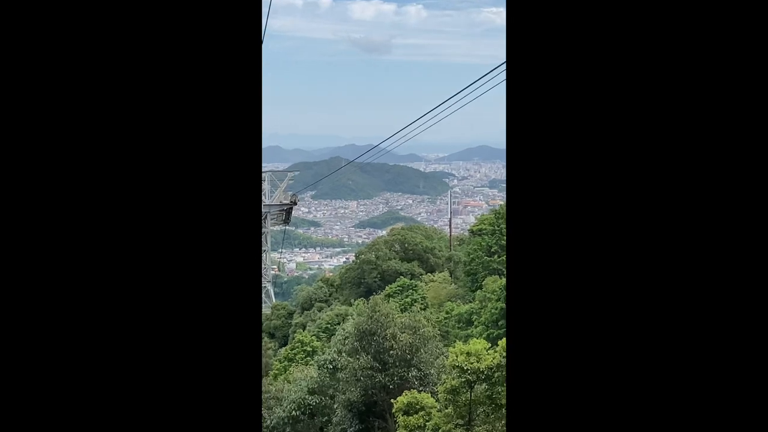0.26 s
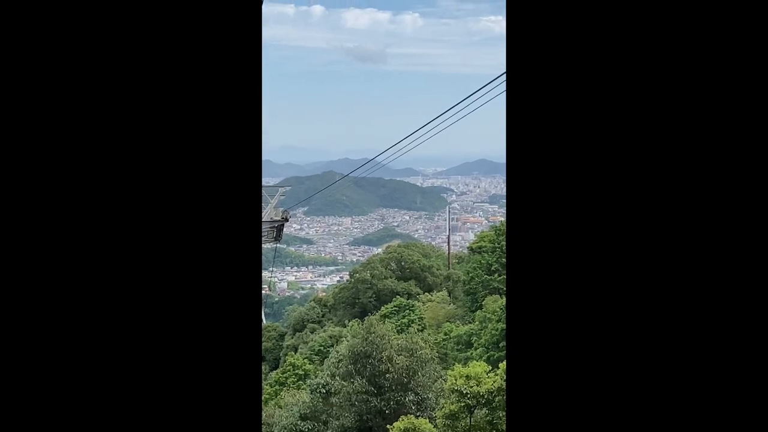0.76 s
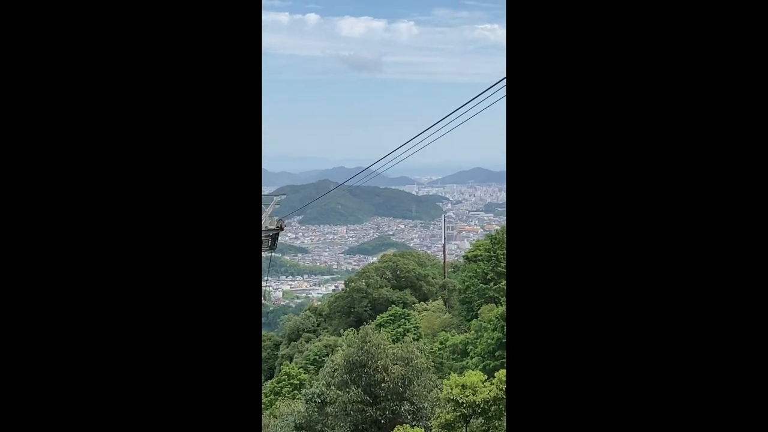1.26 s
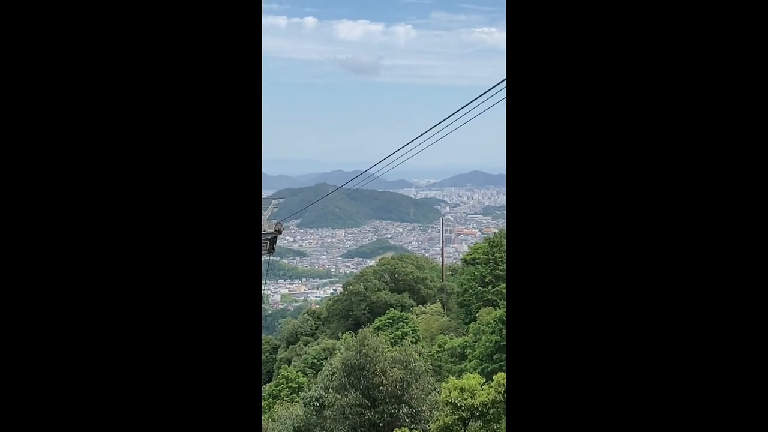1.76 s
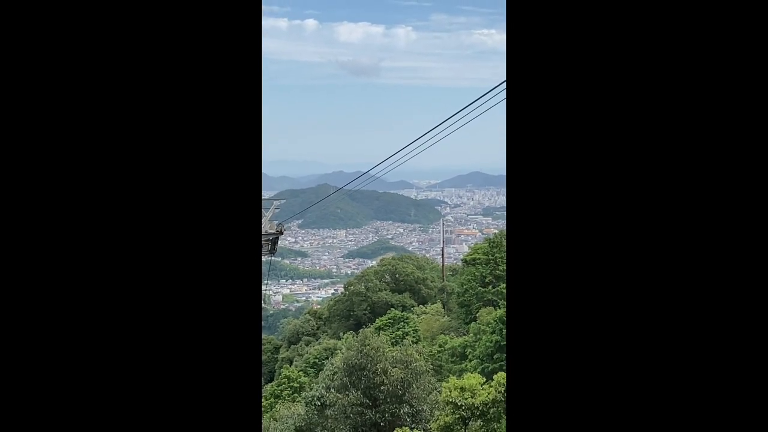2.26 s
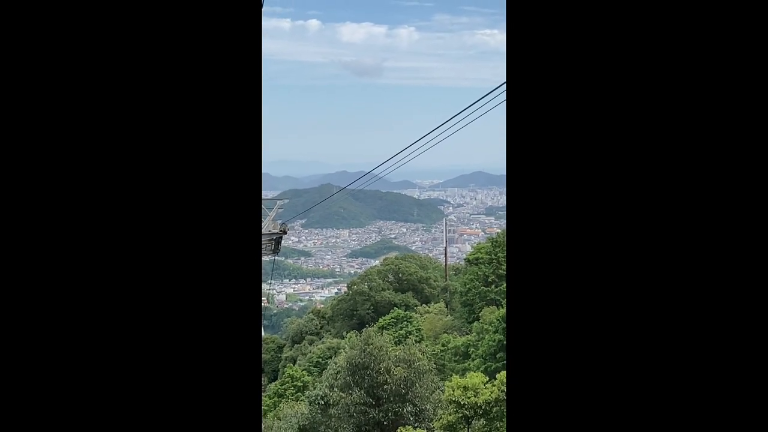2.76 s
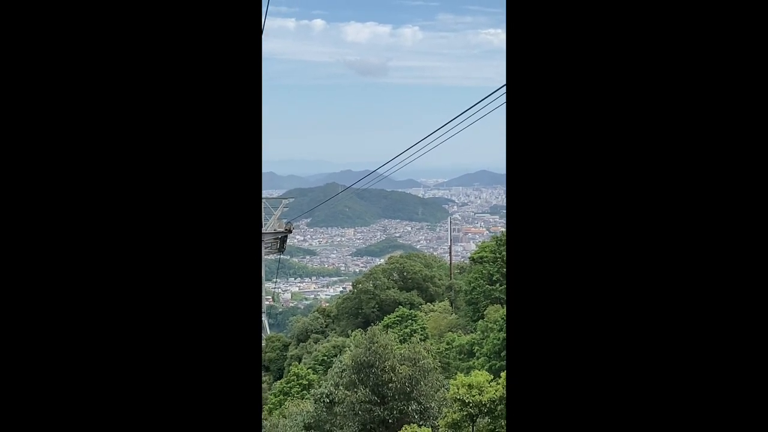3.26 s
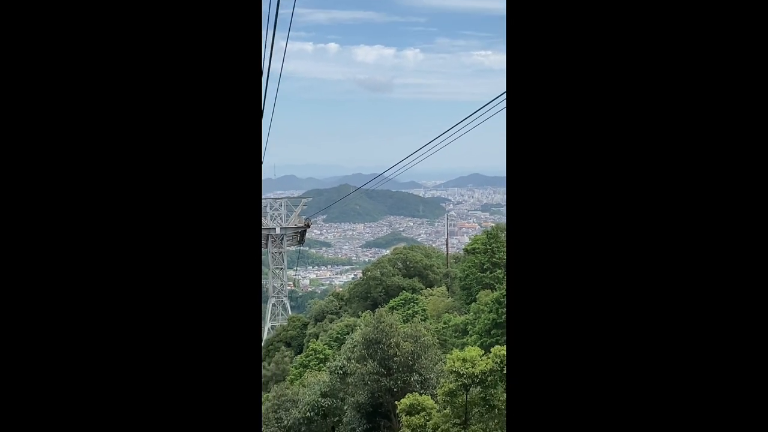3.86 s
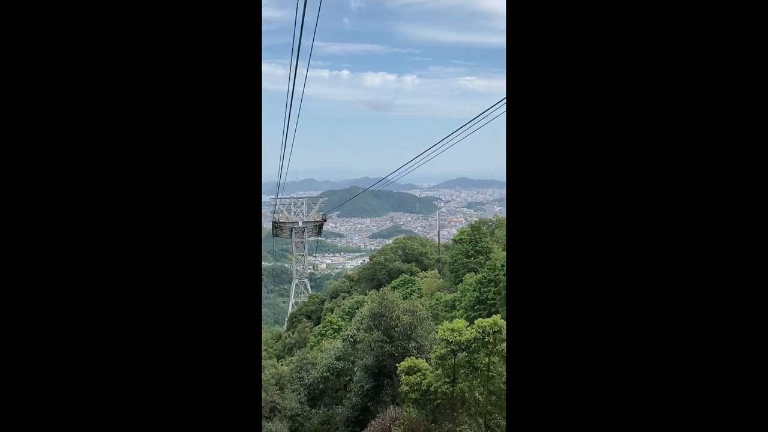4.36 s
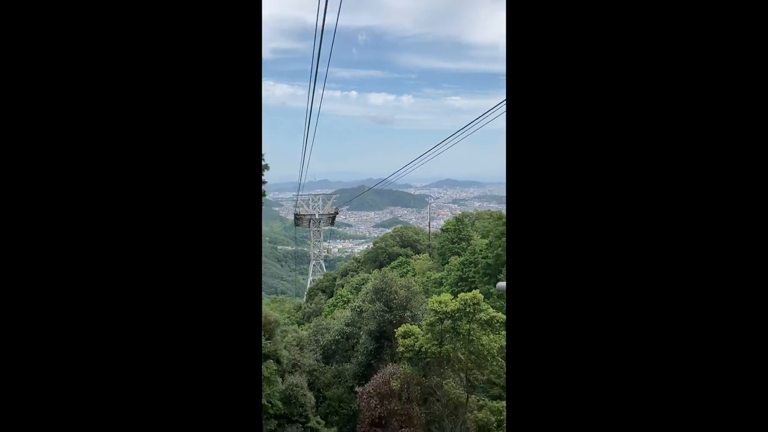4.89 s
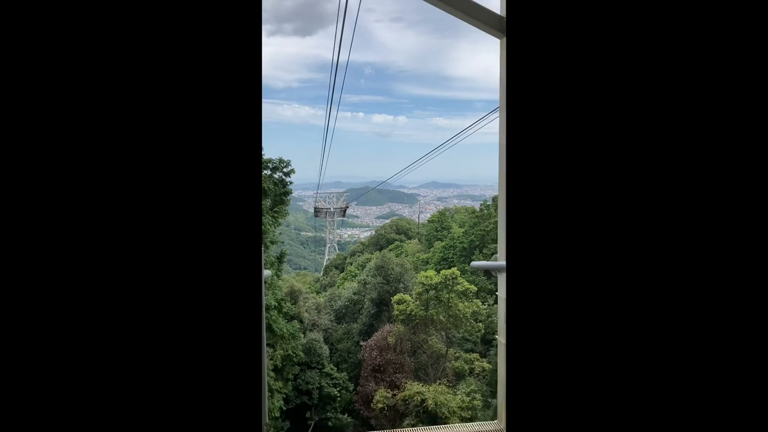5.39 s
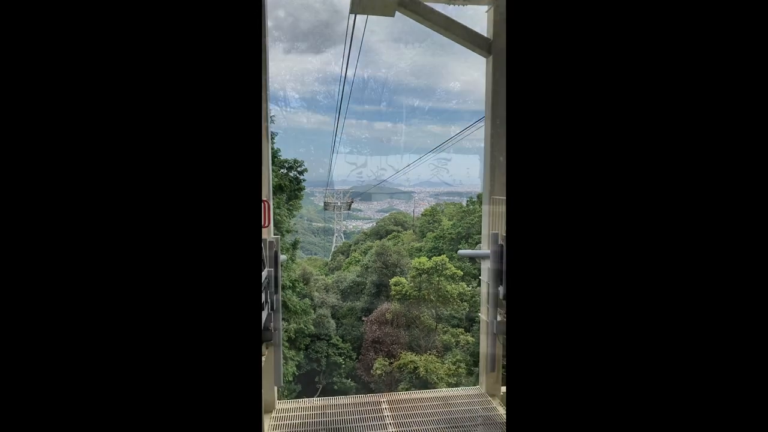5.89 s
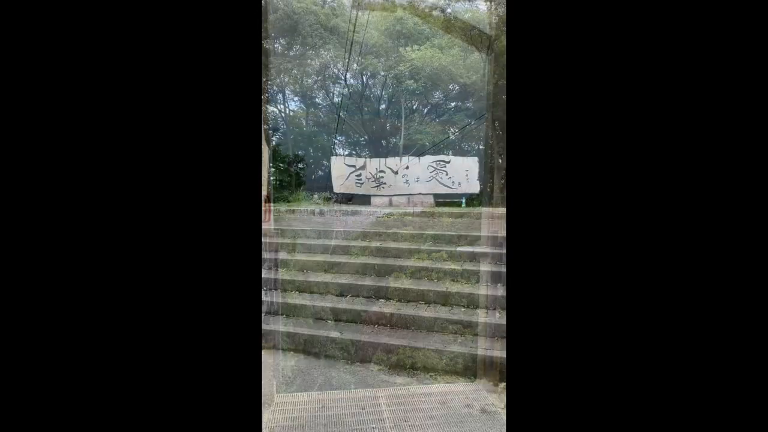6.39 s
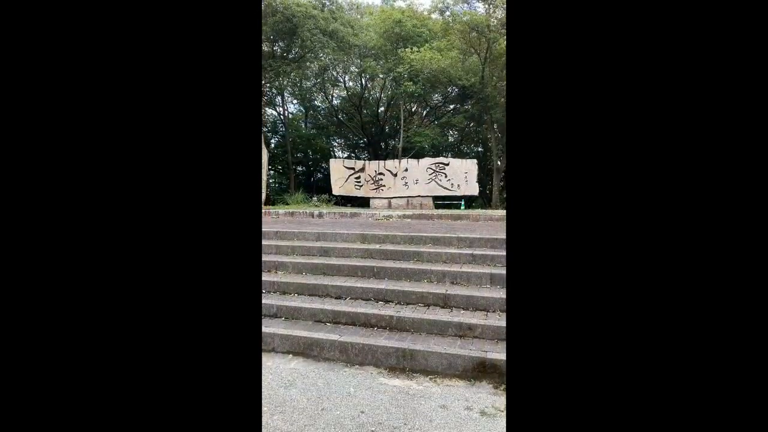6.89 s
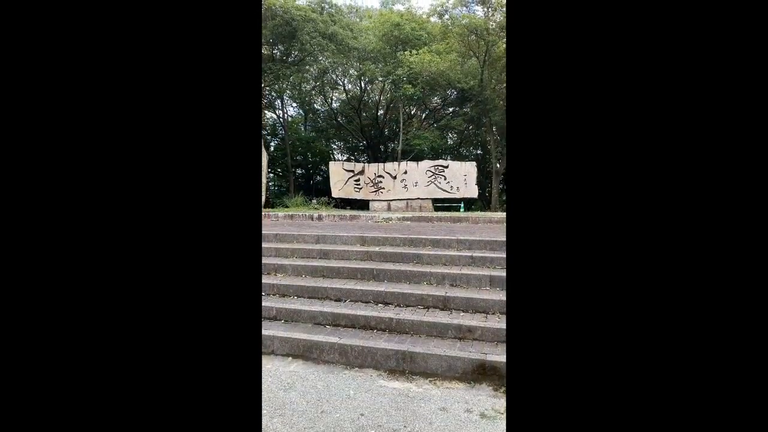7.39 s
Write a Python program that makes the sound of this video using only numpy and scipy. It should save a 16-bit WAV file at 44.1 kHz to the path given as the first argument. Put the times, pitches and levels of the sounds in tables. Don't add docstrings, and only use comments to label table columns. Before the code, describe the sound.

Outdoors on a wooded hillside, a thick cicada chorus hisses brightly and steadily above the low hum, rumble and thin whine of cable car machinery. A tiny air pop touches the microphone before four seconds. A single cicada winds up around five seconds. Near six seconds everything cross-fades to a quieter spot with faint distant hum, a throbbing cicada and a high trill.

```python
import sys
import numpy as np
from scipy import signal
from scipy.fft import rfft, irfft, next_fast_len
from scipy.io import wavfile
from scipy.ndimage import uniform_filter1d

SR = 44100
rng = np.random.default_rng(int(sys.argv[2]) if len(sys.argv) > 2 else 0)


def master_out(mix):
    frames = np.transpose(np.atleast_2d(mix))
    ceiling = np.clip(frames, -1, 1)
    pcm = np.round(ceiling * 32767).astype(np.int16)
    wavfile.write(sys.argv[1], SR, pcm)


def voltage_ratio(decibels):
    exponent = np.asarray(decibels, float) / 20
    return 10 ** exponent


N = 336909

# start_s, loudest_singer_pitch_hz, effort_db
CICADAS = [(0, 2110, -4), (.6, 2177, -1), (1.3, 2206, 2.5), (2, 2180, -1), (2.6, 2130, -4),
           (3.3, 2165, -10), (4.15, 2170, -13), (4.5, 2185, -3.5), (5, 2173, -2.5), (5.7, 2180, 3),
           (6.3, 2133, .4), (6.9, 2198, 3.5), (7.64, 2150, -3.5)]
POP_S = 3.6603


def evened(x):
    return x / np.sqrt(np.mean(x ** 2) + 1e-20)


def read(points, hz):
    f, value = np.transpose(points)
    return np.interp(np.log(hz + 1), np.log(f + 1), value)


def curves(rows, t):
    s, *columns = np.transpose(rows)
    return [np.interp(t, s, column) for column in columns]


def drift(rate_hz, shape=()):
    knots_per_s = 40
    knots = int(N / SR * knots_per_s) + 2
    rolloff = 1 + (np.fft.rfftfreq(knots, 1 / knots_per_s) / rate_hz) ** 4
    z = rfft(rng.standard_normal(shape + (knots,))) / rolloff
    slow = evened(irfft(z, knots)).reshape(-1, knots)
    at_knot = np.arange(N) / SR * knots_per_s
    return np.reshape([np.interp(at_knot, np.arange(knots), v) for v in slow], shape + (N,))


def ring(x, hz, width_hz):
    b, a = signal.iirpeak(hz, hz / width_hz, SR)
    return evened(signal.lfilter(np.convolve(b, b), np.convolve(a, a), x))


def resonate(x, hz, width_hz):
    turn = np.exp(2j * np.pi * np.cumsum(hz * np.ones(N)) / SR)
    r = np.exp(-np.pi * width_hz / SR)
    smooth = signal.lfilter([1], [1, -2 * r, r * r], x / turn)
    return evened((turn * smooth).real)


def clicks(per_s, jitter, spread_db):
    count = np.floor(np.cumsum(per_s * (1 + jitter * drift(15))) / SR)
    return (np.diff(count, prepend=0) > 0) * voltage_ratio(spread_db * rng.standard_normal(N))


def wash(field_db, patchy_db, size):
    hop = size // 4
    frames, hz = N // hop + 5, np.fft.rfftfreq(size, 1 / SR)
    a, b, patches = rng.standard_normal((3, 2, len(hz), frames))
    patches = uniform_filter1d(patches[0], size=8, axis=0)
    patches = evened(uniform_filter1d(patches, size=16, axis=1))
    level_db = field_db(hz[:, None], np.arange(frames) * hop / SR) + patchy_db * patches
    z = (a + 1j * b) * voltage_ratio(level_db)
    return signal.istft(z, nperseg=size, noverlap=size - hop)[1][:, :N]


def tones(places, table):
    t, out = np.arange(N) / SR, np.zeros((2, N))
    for (hz, lag_rad), (left_db, right_db, waver) in zip(places, table):
        angle = 2 * np.pi * (hz * t + rng.random()) + waver * drift(0.4)
        strength = np.sqrt(2) * (1 + waver * drift(7.7)) * voltage_ratio([[left_db], [right_db]])
        out += strength * np.sin([angle, angle + lag_rad])
    return out


def dissolve(t):
    from_s, to_s, station_left = 5.78, 6.75, 0.037
    steps = np.clip((t - from_s) / (to_s - from_s), 0, 1)
    return 1 - (1 - station_left) * steps, steps


def both_db(t, station_db, steps_db):
    station, steps = dissolve(t)
    return 20 * np.log10(np.hypot(station * voltage_ratio(station_db), steps * voltage_ratio(steps_db)))


def town():
    # hz, level_db_per_hz
    spectrum = [(28, -29), (42, -2), (70, -1.5), (190, -6), (250, -15), (374, -10), (455, -16.5),
                (847, -23), (1120, -15.5), (1600, -21), (2000, -12), (2600, -12), (3600, -23.5)]
    return voltage_ratio(-49.5) * evened(wash(lambda hz, t: read(spectrum, hz), 0.82, size=2048))


def far_hum():
    # hz, right_lag_rad
    hum_at = [(48.8, 0), (74.5, 0), (123.8, 0)]
    # left_db, right_db, waver_0_to_1
    hum = [(-53.5, -52.5, .2), (-54.5, -55.5, .2), (-61, -60, .3)]
    return tones(hum_at, hum)


def machinery():
    # hz, level_db_per_hz
    spectrum = [(28, -45), (42, -27), (60, -4.5), (140, -2.5), (220, -6), (300, -10.5), (400, -8.5),
                (520, -14.5), (900, -14.5), (1400, -18.5), (1900, -18.5), (2600, -19), (3500, -25.5)]
    return voltage_ratio(-45) * evened(wash(lambda hz, t: read(spectrum, hz), 0.94, size=2048))


def drive_tones():
    # hz, right_lag_rad
    drive_at = [(57.5, 0), (119.7, 0), (269.3, .2), (538.6, .7), (807.9, -.3), (1077.2, -2.1),
                (1346.5, -.1), (1615.8, .2), (479.4, -.2), (1436.8, .2)]
    # left_db, right_db, waver_0_to_1
    levels = [(-52, -54, 0.38), (-50, -50.5, 0.39), (-68, -65.5, 0.79), (-51.5, -52, 0.06),
              (-60, -61, 0.14), (-57.5, -69, 0.38), (-60, -69.5, 0.22), (-86, -90, 0), (-59, -59.5, 0.2),
              (-74, -82, 0.5)]
    return tones(drive_at, levels)


def whines():
    whine_hz = [387, 3770, 4996, 5461, 5915, 7020, 8033, 8226]
    # width_hz, level_db, right_port_gain (1 alike, 0 silent, -1 opposite)
    shapes = [(21.6, -62, .9), (16, -65, -1), (16, -52, -.6), (16, -52, -.95), (22, -50, -.42),
              (16, -58, 0), (15, -56.5, .9), (40, -53, .9)]
    noise, out = rng.standard_normal(N), np.zeros((2, N))
    for hz, (width_hz, db, right) in zip(whine_hz, shapes):
        out += voltage_ratio(db) * ring(noise, hz, width_hz) * [[1], [np.clip(right, -1, 1)]]
    return out


def chorus():
    # hz, level_db_per_hz
    spectrum = [(2300, -22), (3200, -28.5), (3650, -61), (3850, -14.5), (4300, -3), (4800, -3), (5700, 1.5),
                (7200, -1), (8400, -3), (9200, -6), (9900, -12), (11000, -7.5), (13500, -6.5),
                (15700, -7.5)]
    yield_db_per_db = -.16
    ripple = evened(rng.standard_normal(513))[:, None]

    def field_db(hz, t):
        low_db = both_db(t, station_db=.4, steps_db=-.3) + yield_db_per_db * curves(CICADAS, t)[1]
        bright_db = both_db(t, station_db=-.3, steps_db=-1.4)
        share = np.clip((hz - 9500) / 1000, 0, 1)
        return read(spectrum, hz) + (1 - share) * low_db + share * bright_db + 1.3 * ripple
    return voltage_ratio(-34) * evened(wash(field_db, 1.67, size=1024))


def trill(db, swell_s, length_s, swell_db, hz, width_hz, clicks_per_s, bursts_hz, peak_s):
    t = np.arange(N) / SR
    stroke_db = 5 * np.cos(2 * np.pi * bursts_hz * (t - peak_s) + .3 * drift(1.2))
    leaves = rng.standard_normal((2, 300)) * np.exp(-np.arange(300) / 45.)
    strokes = clicks(clicks_per_s, 0.042, 2.5) * voltage_ratio(stroke_db)
    smeared = signal.oaconvolve(strokes[None], leaves, axes=1)[:, :N]
    swell = np.exp(-((t - swell_s) / length_s) ** 2)
    return voltage_ratio(db + swell_db * swell) * ring(smeared, hz, width_hz)


def trills(places):
    # level_db, swell_at_s, swell_length_s, swell_db
    songs = [
        (-53, 1.3, 1.2, 2),
        (-48.5, 6.97, .22, 4),
    ]
    # resonance_hz, width_hz, clicks_per_s, bursts_per_s, burst_peak_s
    wings = [(13600, 2500, 376, 16, 1.34), (15100, 1700, 205, 17.3, 7.035)]
    return sum(share ** 2 * trill(*song, *wing) for share, song, wing in zip(places, songs, wings))


def cicadas():
    # pitch_multiple, width_hz, mid_effort_db, slope_db_per_db_of_effort
    body = [(1.002, 77.5, -48, 0.4), (1.998, 260, -43, 0.8), (3.9, 710, -40, 0.49)]
    t = np.arange(N) / SR
    loudest_hz, effort_db = curves(CICADAS, t)
    sizes_hz = np.linspace(2070, 2310, num=5)[:, None]
    turn = voltage_ratio(1.5 * drift(.7, (5,)) - 5 * ((sizes_hz - loudest_hz) / 85) ** 2)
    turn = turn / np.sqrt((turn ** 2).sum(axis=0)) * voltage_ratio(2.07 * drift(16.0, (5,)))
    out = np.zeros((3, 2, N))
    for hz, share in zip(sizes_hz[:, 0], turn):
        drum = clicks(hz / 5.2, .12, 4.0)
        pair = np.array([drum, np.roll(drum, 4321)])
        pair = share * (pair + .15 * rng.standard_normal((2, N)))
        for k, (times, width_hz, _, _) in enumerate(body):
            out[k] += ring(pair, times * hz, width_hz) * np.std(pair)
    heard_db = both_db(t, 0, 0)
    return sum(voltage_ratio(heard_db + db + slope * effort_db) * evened(v) for v, (_, _, db, slope) in zip(out, body))


def solo(start_s, full_s, full_db, start_hz, full_hz, width_hz, throbs_hz, peak_s, depth_db):
    start_db, tire_db_per_s, sag_hz_per_s = -16, 3.5, 14.5
    t = np.arange(N) / SR
    missing = np.clip((full_s - t) / (full_s - start_s), 0, 1) ** 2
    after_s = np.maximum(t - full_s, 0)
    hz = full_hz + (start_hz - full_hz) * missing - sag_hz_per_s * after_s
    db = full_db + start_db * missing - tire_db_per_s * after_s
    throb = np.cos(2 * np.pi * throbs_hz * (t - peak_s) + .2 * drift(2))
    noise = rng.standard_normal((2, N))
    buzz = resonate(noise, hz, width_hz)
    buzz = buzz + 0.32 * ring(noise, full_hz / 2, 74)
    buzz = buzz + 0.7 * ring(noise, 2.04 * full_hz, 600)
    return voltage_ratio(db + depth_db * throb) * buzz * (t > start_s)


def solos(places):
    # start_s, full_voice_s, full_db, start_hz, full_hz
    songs = [
        (4.194, 5.4, -39, 4210, 4336),
        (5.9, 7.0, -45, 4140, 4168),
    ]
    # width_hz, throbs_per_s, throb_peak_s, depth_db
    buzzes = [(45, 8.5, 5.02, 2.1), (60, 9.95, 7.018, 6)]
    return sum(share * solo(*song, *buzz) for share, song, buzz in zip(places, songs, buzzes))


def pop():
    t = np.arange(12, 1100) / SR
    chirp = np.cos(2 * np.pi * np.log2(t / .00096))
    chirp = chirp * np.exp(-t / .016) * np.minimum(t / .001, 1) ** 2
    out = np.zeros(N)
    out[round(POP_S * SR) + 12:][:len(t)] = voltage_ratio(-32) * chirp
    return np.array([out, -out])


def ports(pair):
    # hz, likeness_0_to_1
    likeness = [(60, 1.01), (200, 0.99), (400, 0.9), (800, 0.36), (1200, 0.77), (2000, 0), (4600, 0.03),
                (5300, 0.8), (7300, 0.97), (10200, 0.94), (13200, 0.94)]
    size = next_fast_len(N)
    hz, (a, b) = np.fft.rfftfreq(size, 1 / SR), rfft(pair, size)
    same = np.clip(read(likeness, hz), 0, 1)
    lag_rad = np.pi * np.maximum(1 + (hz - 5250) / 3280, 0)
    right = same * a * np.exp(-1j * lag_rad) + np.sqrt(1 - same ** 2) * b
    return irfft([a, right], size)[:, :N]


def with_middle_dip(pair):
    band = signal.butter(4, [650, 2050], "band", fs=SR, output="sos")
    middle = signal.sosfiltfilt(band, pair)
    dip = .9 * np.exp(-((np.arange(N) / SR - POP_S - .003) / .024) ** 4)
    return pair - dip * middle


def scene():
    station, steps = places = dissolve(np.arange(N) / SR)
    insects = chorus() + trills(places) + cicadas() + solos(places)
    spread = ports(steps * town() + station * machinery() + insects)
    hums = steps * far_hum() + station * (drive_tones() + whines())
    return with_middle_dip(spread) + hums + pop()


def low_pass(x):
    return signal.sosfilt(signal.butter(12, 15760, fs=SR, output="sos"), x)


def record(dry):
    # hz, gain_db
    sum_kept = [(10900, 0), (11050, 0), (11060, -90), (12300, -90), (12310, -5), (13000, 0)]
    # hz, gain_db
    difference_kept = [(7580, 0), (7590, -90), (8960, -90), (8970, -12), (9700, -7), (10300, 0), (13700, 0),
                       (14450, -11), (14460, -90)]
    size = next_fast_len(N)
    hz = np.fft.rfftfreq(size, 1 / SR)
    left, right = dry * voltage_ratio([[.15], [-.15]])
    total, gap = rfft([left + right, left - right], size) / 2
    total = total * voltage_ratio(read(sum_kept, hz))
    gap = gap * voltage_ratio(read(difference_kept, hz))
    mix = irfft([total + gap, total - gap], size)[:, :N]
    return low_pass(mix)


dry = scene()
out = record(dry)
master_out(out)
```